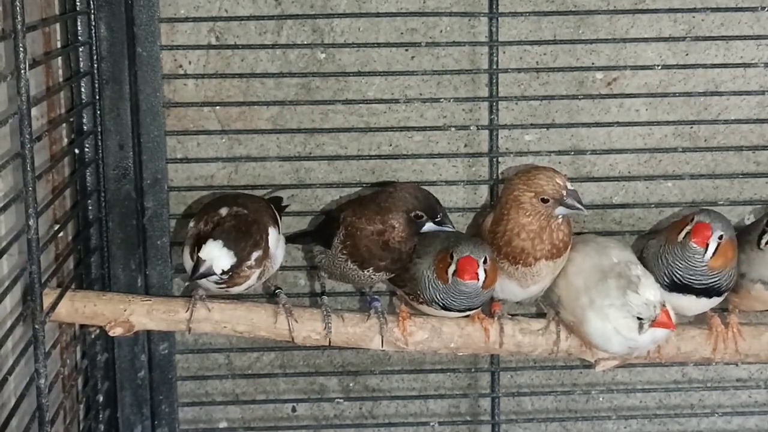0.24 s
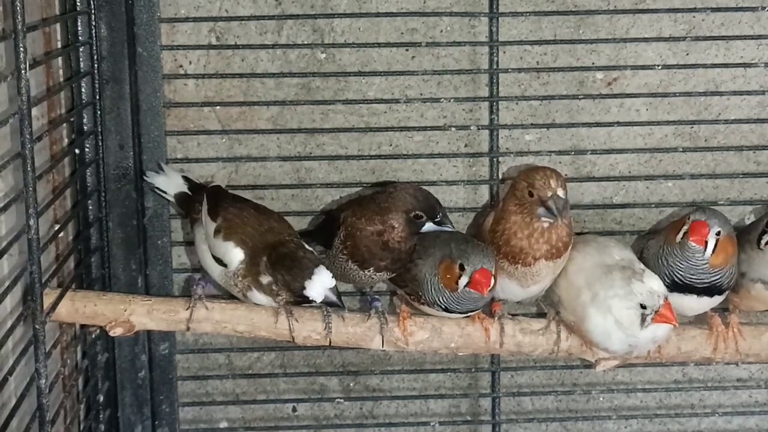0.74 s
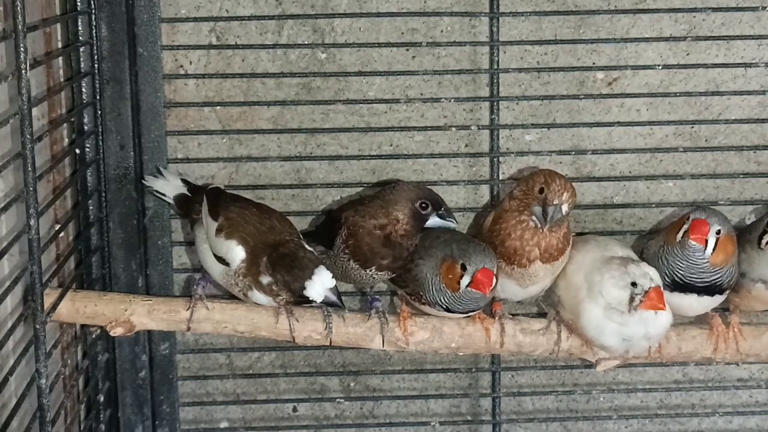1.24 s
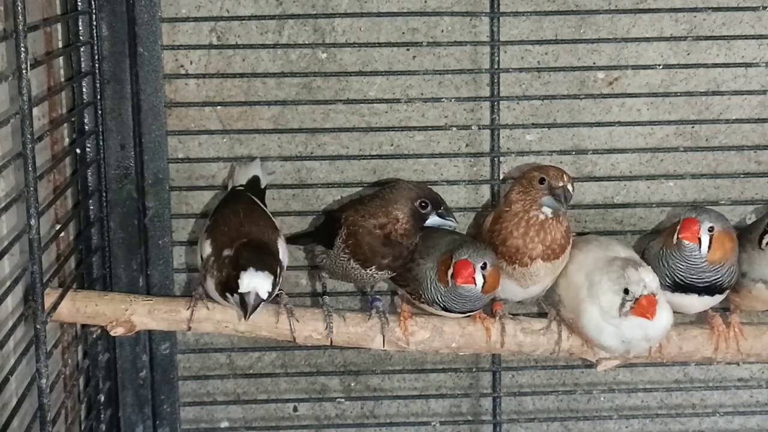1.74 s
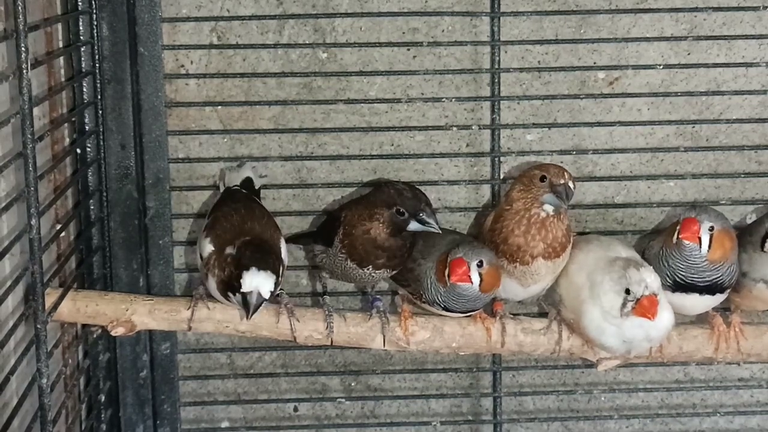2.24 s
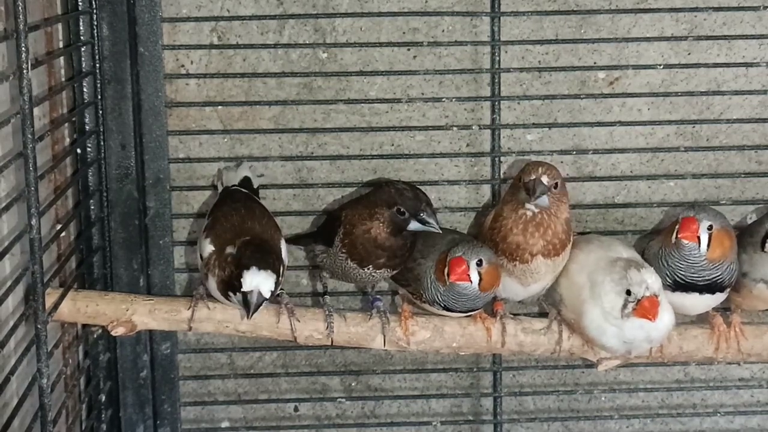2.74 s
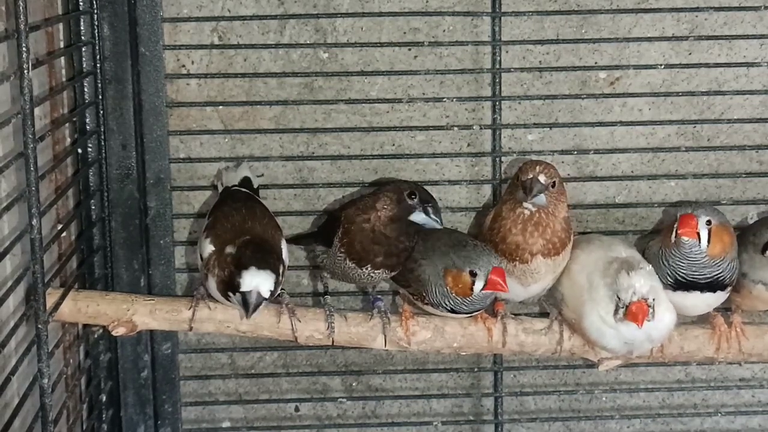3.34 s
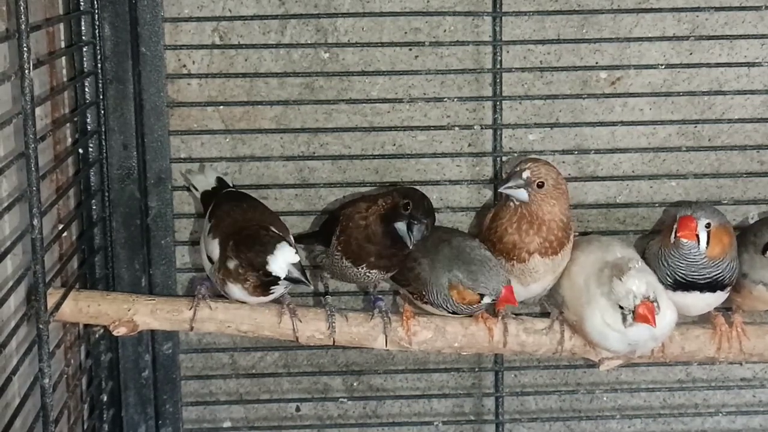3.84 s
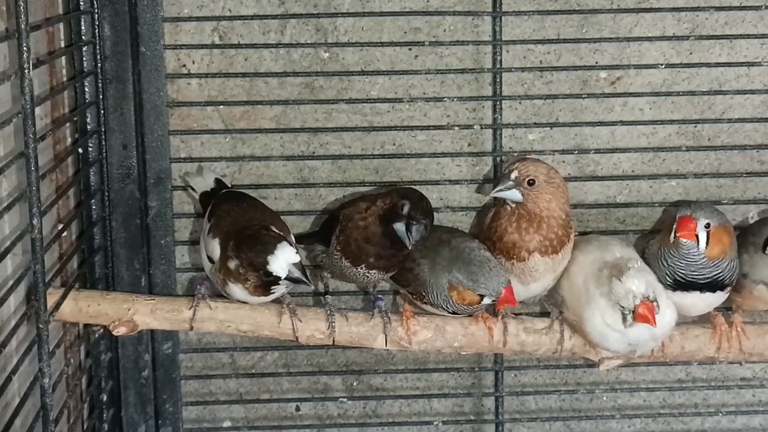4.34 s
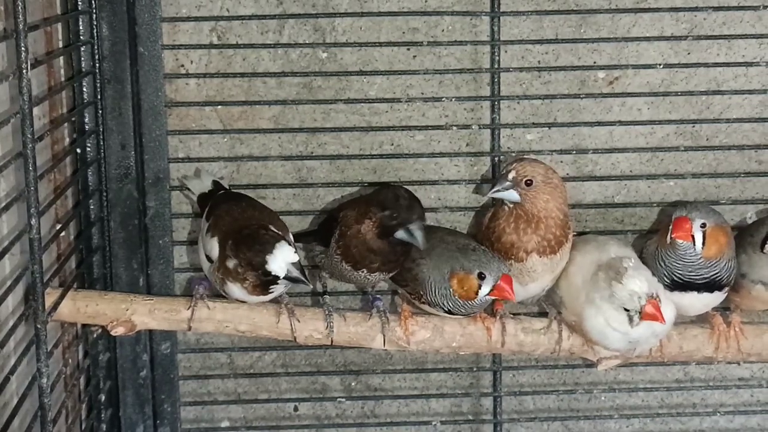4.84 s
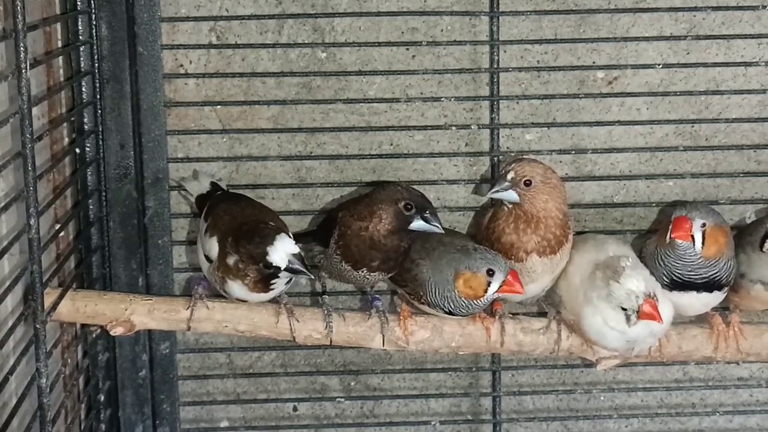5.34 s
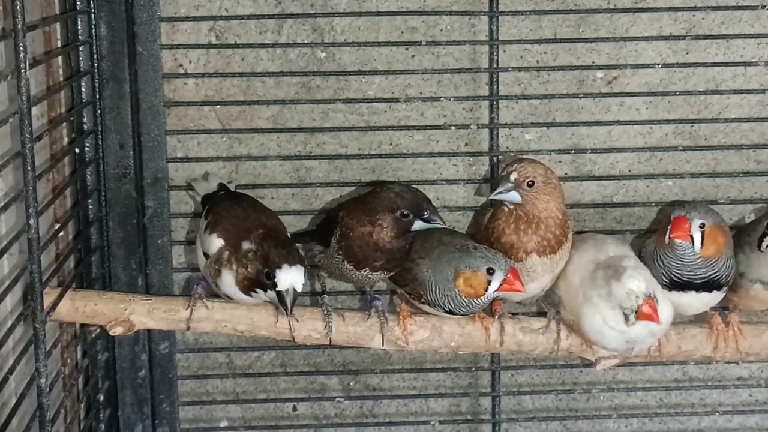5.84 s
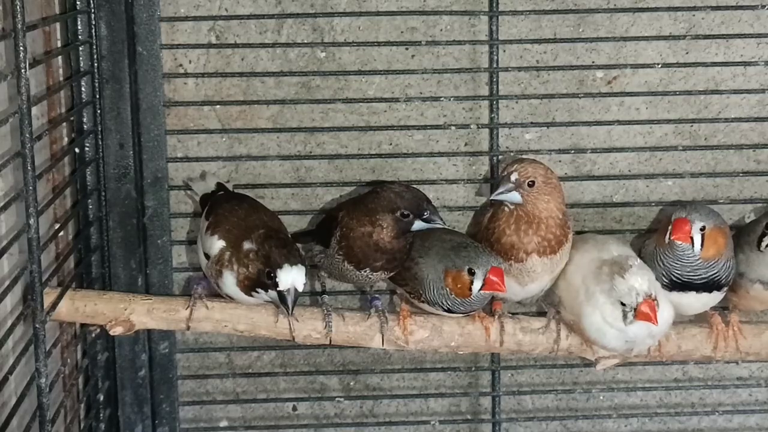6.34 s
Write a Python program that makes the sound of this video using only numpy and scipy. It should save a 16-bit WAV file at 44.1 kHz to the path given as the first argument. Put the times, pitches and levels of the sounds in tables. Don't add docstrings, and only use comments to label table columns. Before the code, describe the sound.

Small caged finches give short, bright, nasal chirps one at a time in a hard-walled room, with faint peeps, rustles and low hum.

```python
import sys
import numpy as np
from scipy import signal
from scipy.fft import rfft, irfft, next_fast_len
from scipy.io import wavfile
from scipy.ndimage import uniform_filter1d, minimum_filter1d

SR = 44100
rng = np.random.default_rng(int(sys.argv[2]) if len(sys.argv) > 2 else 0)


def gain_from_db(level_db):
    decades = np.asarray(level_db, float) / 20
    return 10 ** decades


def wav_record(signal):
    frames = np.transpose(np.atleast_2d(signal))
    bounded = np.clip(frames, -1, 1)
    quanta = np.round(bounded * 32767).astype(np.int16)
    wavfile.write(sys.argv[1], SR, quanta)


N = 290619


def rms_one(x):
    return x / np.sqrt(np.mean(x ** 2) + 1e-20)


def at_hz(points, hz):
    table = np.array(points)
    return np.interp(np.log(hz), np.log(table[:, 0]), table[:, 1])


def filtered(x, order, edges_hz, kind):
    return signal.sosfilt(signal.butter(order, edges_hz, kind, fs=SR, output="sos"), x)


def white(size):
    return rng.standard_normal(max(size, SR // 3))[:size]


def drift(rate_hz, size):
    r = np.exp(-2 * np.pi * rate_hz / SR)
    settle = 4000
    return rms_one(signal.lfilter([1], [1, -2 * r, r * r], white(size + settle))[settle:])


def sampled(rows):
    time_s, *columns = np.transpose(rows)
    start = int(time_s[0] * SR)
    t = np.arange(start, int(time_s[-1] * SR)) / SR
    return start, [np.interp(t, time_s, column) for column in columns]


def add(out, start, x, pan_db):
    x = x * signal.windows.tukey(len(x), min(1, 260 / len(x)))
    x = x[:N - start]
    out[:, start:start + len(x)] += x * gain_from_db(np.array([[pan_db / 2], [-pan_db / 2]]))


def stack(pitch_hz, partial_db, rough, count):
    size = len(pitch_hz)
    phase = 2 * np.pi * np.cumsum(pitch_hz * (1 + 0.13 * rough * drift(280, size))) / SR
    wave, power = 0, 1e-20
    for k in range(1, count + 1):
        gain = gain_from_db(partial_db(k, k * pitch_hz)) * (k * pitch_hz < .4 * SR)
        flutter = 1 + rough * drift(300, size)
        wave = wave + gain * flutter * np.sin(k * phase + k * k)
        power = power + gain ** 2 / 2
    return wave / np.sqrt(power)


REST_HZ, LEAP_CURVE, TAIL_SAG_HZ_PER_S = 1560, 1.45, 1800
TENSE_HZ, TENSE_ONSET_S = 2002, 0.006
ONSET_DB, ONSET_S, ONSET_MUTE_DB = 23, 0.0073, -1.5
DROP_LOSS_DB_PER_OCTAVE, DROP_HOARSE, STEADY_MUTE_DB = 25, 0.14, 8.5


def gesture(tense, climb_hz_per_s, length_s, top_hz, end_hz, level_db,
            leap_s, turn_s, fall_s, fade_db, mute_db):
    t = np.arange(int(length_s * SR)) / SR
    dropped = np.clip((t - turn_s) / fall_s, 0, 1)
    slack = np.exp(-max(mute_db, 0) / STEADY_MUTE_DB)
    rest_hz, onset_s = (TENSE_HZ, TENSE_ONSET_S) if tense else (REST_HZ, ONSET_S)
    onset = np.exp(-t / onset_s)

    sag_hz = TAIL_SAG_HZ_PER_S * np.maximum(t - turn_s - fall_s, 0)
    drop_hz = (top_hz - end_hz) * dropped ** 1.1 + sag_hz
    leap_hz = (top_hz - rest_hz) * np.exp(-(t / leap_s) ** LEAP_CURVE)
    below_hz = climb_hz_per_s * np.maximum(turn_s - t, 0) * (1 - np.exp(-t / leap_s))
    pitch_hz = top_hz - leap_hz - below_hz - drop_hz

    drop_db = slack * DROP_LOSS_DB_PER_OCTAVE * np.log2(1 - drop_hz / top_hz)
    level_db = level_db - ONSET_DB * onset - fade_db * (t / length_s) ** 1.32 + drop_db
    low_db = -ONSET_MUTE_DB * onset - mute_db * dropped
    return pitch_hz, level_db, low_db, slack * DROP_HOARSE * dropped


# start_s, length_s, top_hz, end_hz, level_db
CHIRPS = [(0.141, 0.081, 2276, 1737, -16), (0.278, 0.064, 1950, 1540, -12.5),
          (0.674, 0.068, 2185, 1757, -16.5), (0.703, 0.06, 1854, 1560, -20), (1.637, 0.14, 2377, 2136, -16),
          (2.225, 0.099, 2479, 2179, -15), (2.646, 0.073, 2279, 2193, -14), (3.29, 0.1, 2503, 2200, -15.5),
          (4.166, 0.076, 2274, 1662, -17.5), (4.331, 0.066, 2415, 1967, -12.5),
          (5.444, 0.068, 1847, 1505, -18), (5.472, 0.029, 2390, 1843, -22),
          (2.683, 0.038, 2165, 2153, -14.5), (3.386, 0.045, 2540, 2239, -19.5)]
# leap_s, turn_s, fall_s, fade_db, mute_db (low partials, after the drop)
BENDS = [(0.011, .056, 0.013, 4, -1.5), (0.01, .035, .028, 13.5, 4), (0.0096, .042, 0.022, 4.5, 5.5),
         (0.0099, .04, 0.0092, 5.5, 0.5), (0.008, .032, 0.017, 26.5, 30),
         (0.0099, 0.043, 0.0051, 12.5, 26.5), (0.0078, 0.047, 0.024, 18.5, 15.5),
         (.011, .032, .056, 0.5, 5), (.012, 0.054, 0.018, 3, 3.5), (0.009, .04, 0.004, 11.5, 25.5),
         (0.007, .041, 0.02, 8.5, 2.5), (0.008, 0.013, 0.014, 8.5, 4.5), (0.0056, 0.016, 0.012, 12.5, 4.5),
         (0.0019, .006, 0.02, 15, 2)]
# pan_db (left-right), beak_hz, lift_db, rough (0-1), second_db
PERCH = [(-3, 19000, -3, 0.05, 0), (-2.5, 1300, 4.5, 0.05, 0.5), (-2.5, 6500, 4, 0.01, -0.5),
         (-0.5, 2500, -0.5, 0.2, -2), (-3, 6230, 12.5, 0.13, 3), (1, 6500, 11, 0.07, 7),
         (-5.5, 15750, 16.5, .05, -1), (0, 5480, 7.5, 0.03, 2.5), (-0.5, 6900, 3.5, 0.05, -1),
         (4.5, 4750, 6, 0.16, 5.5), (-0.5, 7930, 11.5, 0.1, -4.5), (9, 4030, -2.4, 0.4, 10),
         (-6.5, 6550, 23, 0.3, -8.5), (2.3, 5800, 7, 0.2, 9)]
# first_db, treble_db (per octave above partial 3), fourth_db, fifth_db, climb_hz_per_s
VOICES = [(1.5, -1.5, -2.9, 2, 2500), (2, 2.5, 3.5, -3.5, 1300), (6, -1.5, 1, 3.5, 810),
          (0, 0, 2.5, -3.3, 2600), (2.5, -2.5, 0.1, -0.2, 350), (3, -2.5, 0.5, -2, 670),
          (0, -0.5, 0.5, 2.5, 230), (1.5, -8.5, -5, 3, 250), (3, -2.5, -2.5, 2.5, 1600),
          (6, -3.5, -2.5, 1, 4400), (4.5, 0, 2.5, -0.5, 3500), (13.5, -5.5, -4.2, 11.8, 300),
          (-17, -1, 6, -1.8, 300), (-2.5, -2.5, 2.8, 4, 280)]
TENSE = (9, 11, 13)
# multiple, level_db
SYRINX = [(1, -3), (2, -3.5), (3, -2), (4, -9), (5, -17), (6, -21), (7, -24.5), (8, -19), (9, -24.5)]
# freq_hz, gain_db
TRACT = [(1350, -19.5), (1560, -1.5), (2300, -0.5), (3000, 9.5), (4000, -1), (8200, 1), (12700, 9.5),
         (15800, -8)]
FOURTH_PER_MUTE, SIXTH_PER_MUTE = 0.45, 0.27


def chirps():
    out = np.zeros((2, N))
    for i, ((start_s, *call), bend, perch, voice) in enumerate(zip(CHIRPS, BENDS, PERCH, VOICES)):
        pan_db, beak_hz, lift_db, rough, second_db = perch
        first_db, treble_db, fourth_db, fifth_db, climb_hz_per_s = voice
        pitch_hz, level_db, low_db, cracked = gesture(i in TENSE, climb_hz_per_s, *call, *bend)
        own_db = {1: first_db, 2: second_db, 4: fourth_db - FOURTH_PER_MUTE * bend[-1], 5: fifth_db,
                  6: -SIXTH_PER_MUTE * np.minimum(low_db, 0)}

        def partial_db(k, hz):
            source_db = SYRINX[k - 1][1] + low_db * (k <= 2) + own_db.get(k, 0)
            tilt_db = treble_db * np.log2(max(k / 3, 1))
            beak_db = lift_db * np.exp(-(np.log2(hz / beak_hz) / 0.12) ** 2)
            return source_db + tilt_db + at_hz(TRACT, hz) + beak_db

        size = len(pitch_hz)
        high_noise = filtered(white(size), 3, [7500, 14500], "band")
        hoarse = rough + cracked + .55 * np.exp(-np.arange(size) / (.008 * SR))
        call_wave = stack(pitch_hz, partial_db, hoarse, count=9) + gain_from_db(-20) * high_noise
        add(out, int(start_s * SR), gain_from_db(level_db) * call_wave, pan_db)
    return filtered(out + 1e-18, 6, 1450, "high")


# time_s, pitch_hz, level_db
NASAL = [
    [(2.082, 625, -52), (2.09, 619, -37.5), (2.102, 619.3, -43.5), (2.17, 600, -44.5)],
    [(4.425, 685, -51), (4.439, 640, -36.5), (4.461, 619, -45.5), (4.47, 547, -29.5)],
    [(5.175, 506, -52), (5.183, 545, -47.5), (5.233, 598.4, -44.5), (5.259, 551, -47.5), (5.275, 540, -73)],
    [(5.965, 485, -50.5), (5.99, 562, -33)],
]
# pan_db (left-right), first_db, treble_db (per octave), rough (0-1)
NASAL_VOICE = [(5, -2.5, -19, 0.049), (-6.5, -8, 21, 0.19), (-1.5, -13.5, -11.5, 0.043),
               (7.5, -3.5, -39, 0.051)]
# freq_hz, gain_db
NASAL_THROAT = [(290, -30), (520, -8.5), (850, -23.5), (1200, -17), (1800, -11.5), (2900, -11),
                (5600, -16.5), (9000, -61.5)]


def nasal_notes():
    out = np.zeros((2, N))
    for rows, (pan_db, first_db, treble_db, rough) in zip(NASAL, NASAL_VOICE):
        start, (pitch_hz, level_db) = sampled(rows)

        def partial_db(k, hz):
            return at_hz(NASAL_THROAT, hz) + first_db * (k == 1) + treble_db * np.log2(max(k / 6, 1))

        add(out, start, gain_from_db(level_db - 4.5) * stack(pitch_hz, partial_db, rough, count=14), pan_db)
    return out


# time_s, pitch_hz, level_db
SQUAWK = [
    (5.991, 1024, -29.5),
    (5.997, 1030, -29),
    (6.003, 1234, -41),
    (6.015, 1302, -32.5),
    (6.022, 1140, -74),
    (6.035, 1074, -67.5),
]
# freq_hz, gain_db
SQUAWK_THROAT = [(350, -59), (600, -8), (1210, -14.5), (1400, -14), (2190, -4), (2790, -11.5), (3700, 0.5),
                 (5840, -16.5), (15000, -31.5)]


def squawk():
    out = np.zeros((2, N))
    start, (pitch_hz, level_db) = sampled(SQUAWK)
    voice = stack(pitch_hz, lambda k, hz: at_hz(SQUAWK_THROAT, hz), 0.48, count=14)
    add(out, start, gain_from_db(level_db) * voice, -1.5)
    return out


# start_s, level_db, decay_s,
# centre_hz, width_octaves
RUSTLES = [(1.023, -53, 0.0084, 2290, 0.88), (1.063, -46.5, 0.0049, 1970, 1.03),
           (1.679, -45, 0.0053, 190, 2.4), (2.271, -51, 0.0056, 260, 1.6),
           (2.174, -56.5, 0.025, 3100, 0.65), (3.698, -67.5, 0.043, 5300, 0.48),
           (0.74, -50.5, 0.009, 920, 0.38), (5.457, -54.5, 0.043, 860, 0.66),
           (1.357, -60.5, 0.011, 3000, 2.5), (3.193, -64, 0.01, 7920, 2.9), (3.608, -56.5, 0.01, 4500, 1.1),
           (3.97, -63, 0.014, 3040, 1.3), (4.713, -64, 0.034, 3900, 3), (5.005, -53.5, 0.025, 14800, 0.48),
           (2.94, -55, .006, 1260, 2.6), (2.686, -27, .004, 2000, 2.4), (5.484, -28.5, .003, 4700, 1.9),
           (4.333, -25.5, 0.0088, 5000, 2.3), (5.011, -58.5, 0.011, 3800, 2.4),
           (5.079, -63.5, 0.053, 9000, 1.1), (5.291, -63, 0.013, 11200, 0.79),
           (5.417, -61, 0.033, 3100, 1.8), (5.666, -56.5, 0.013, 8600, 3.1),
           (5.833, -61, 0.026, 2750, 0.93), (6.088, -62.5, 0.013, 7900, 2.3),
           (6.351, -64.5, 0.027, 3300, 1.4)]


def rustles():
    out = np.zeros((2, N))
    for start_s, level_db, decay_s, centre_hz, width_octaves in RUSTLES:
        t = np.arange(int(4 * decay_s * SR)) / SR
        edges_hz = np.clip(centre_hz * 2 ** (np.array([-.5, .5]) * width_octaves), 100, .45 * SR)
        grains = white(len(t)) * gain_from_db(3 * drift(400, len(t)))
        puff = rms_one(filtered(grains, 2, edges_hz, "band"))
        add(out, int(start_s * SR), gain_from_db(level_db) * puff * np.exp(-t / decay_s), 0)
    return out


# start_s, first_hz, level_db
PEEPS = [(0.625, 3550, -83), (0.91, 3640, -70), (.95, 4020, -71), (1.41, 3580, -70.5), (1.514, 3730, -70),
         (1.937, 3770, -73), (2.516, 3717, -68.5), (2.574, 3340, -67.5), (2.94, 3560, -66.5),
         (3.1, 3750, -72), (3.15, 2940, -72.5), (3.2, 2660, -74), (3.72, 3350, -72.5), (3.95, 3700, -75),
         (4.02, 3130, -71), (4.58, 3820, -70), (4.696, 3760, -64), (5.017, 3360, -68.5), (5.06, 3990, -72),
         (5.08, 2350, -71), (5.7, 3530, -70), (5.79, 3500, -68), (6.365, 3580, -66)]
PEEP_S, PEEP_SLIDE = .045, .11
# start_s, first_hz, level_db
TICKS = [
    (4.995, 5230, -75),
    (5.171, 5320, -70),
    (5.419, 5520, -71),
    (5.832, 5550, -66),
    (6.338, 5420, -72),
]
TICK_S, TICK_SLIDE = 0.018, 0.112
# start_s, length_s, first_hz, last_hz, level_db
COOS = [(0.06, 0.018, 2340, 2250, -77), (0.567, 0.046, 2300, 2390, -67.5), (1.219, 0.065, 681, 600, -68),
        (1.772, 0.22, 778, 710, -71.5), (2.56, 0.03, 690, 605, -61.5), (2.88, 0.032, 212, 197.6, -53.5),
        (2.94, 0.019, 208.5, 200, -50), (3.951, 0.046, 5160, 2205, -75), (5.85, 0.02, 1210, 1090, -70),
        (5.888, .06, 2600, 3640, -75), (5.921, 0.053, 3590, 3920, -72), (6.377, 0.044, 1100, 985, -79)]


def far_notes():
    out = np.zeros((2, N))
    slides = [(s, PEEP_S, hz, hz * (1 - PEEP_SLIDE), db) for s, hz, db in PEEPS]
    slides += [(s, TICK_S, hz, hz * (1 - TICK_SLIDE), db) for s, hz, db in TICKS]
    for start_s, length_s, first_hz, last_hz, level_db in slides + list(COOS):
        size = int(length_s * SR)
        pitch_hz = np.linspace(first_hz, last_hz, size) * (1 + 0.02 * drift(250, size))
        whistle = np.hanning(size) ** .5 * np.sin(2 * np.pi * np.cumsum(pitch_hz) / SR)
        add(out, int((start_s - .006) * SR), gain_from_db(level_db + 7) * whistle, 0)
    return out


# freq_hz, left_minus_right_db
PORTS = [(500, -3), (2000, -2.5), (5500, -11), (9000, -4.5), (13000, 12.5)]
# freq_hz, t60_s
ROOM_T60 = [(500, 0.2), (1500, 0.22), (4000, 0.25), (8000, 0.21), (13000, 0.17)]
ROOM_DB, EARLY_DB, PORT_LAG_S = -3, -5, .0001


def room(x):
    t = np.arange(int(.6 * SR)) / SR
    tail = 0
    edges_hz = 125 * 2. ** np.arange(8)
    for low_hz, high_hz in zip(edges_hz, np.append(edges_hz[1:], 19000)):
        band = filtered(rng.standard_normal((2, len(t))), 2, [low_hz, high_hz], "band")
        tail = tail + band * gain_from_db(-60 * t / at_hz(ROOM_T60, np.sqrt(low_hz * high_hz)))
    tail = tail * (1 - np.exp(-(t / 0.006) ** 2))
    tail = tail / np.sqrt(np.sum(tail ** 2, axis=1, keepdims=True)) * gain_from_db(ROOM_DB)

    early = np.zeros((2, len(t)))
    for side in early:
        delays = (rng.uniform(.0008, .007, 10) * SR).astype(int)
        side[delays] = gain_from_db(EARLY_DB) * rng.uniform(-1, 1, 10)

    size = next_fast_len(N + len(t))
    bins = np.arange(size // 2 + 1)
    colour_db = at_hz(PORTS, bins * SR / size + 1) * [[.5], [-.5]]
    left_only = np.array([[1], [0]])
    lag = np.exp(-2j * np.pi * bins / size * PORT_LAG_S * SR * left_only)
    near = rfft(x, size) * gain_from_db(colour_db) * (1 + rfft(early, size)) * lag
    far = rfft(x.mean(axis=0), size) * rfft(tail, size)
    return irfft(near + far, size)[:, :N]


# freq_hz, likeness (0-1)
LIKENESS = [(30, 0.92), (90, 0.65), (200, 0.84), (400, 0.082), (1000, 0.21), (4000, 0.055)]


def banded_noise(spectrum):
    out = 0
    edges_hz = 20 * 2 ** np.arange(0, 10, .5)
    gusts_db = 0.95 * drift(27, N)
    sources = rng.standard_normal((2, 2, N))
    for k, (low_hz, high_hz) in enumerate(zip(edges_hz, edges_hz[1:])):
        hz = np.sqrt(low_hz * high_hz)
        if spectrum[0][0] / 1.2 < hz < spectrum[-1][0] * 1.2:
            mid, side = filtered(sources[k % 2], 2, [low_hz, high_hz], "band")
            alike = np.clip(at_hz(LIKENESS, hz), 0, 1)
            gain = gain_from_db(at_hz(spectrum, hz) + 0.76 * drift(5.5, N) + gusts_db)
            out = out + gain * (np.sqrt(1 + alike) * mid + np.sqrt(1 - alike) * side * [[1], [-1]])
    return rms_one(out)


# freq_hz, density_db (per Hz)
HUM = [(13, -45), (22, -32), (69, 2), (93, 3.5), (500, -17.5), (650, -43.5), (1100, -120)]
HUM_DB, HUM_WANDER_DB, HUM_SWELL_S, HUM_SWELL_DB = -56.5, .8, 4.95, 2


def hum(duck_db):
    t = np.arange(N) / SR
    swell_db = HUM_SWELL_DB * np.clip((t - HUM_SWELL_S) / .5, 0, 1)
    level_db = HUM_DB + HUM_WANDER_DB * drift(1.6, N) + swell_db
    return gain_from_db(level_db + 0.34 * duck_db) * banded_noise(HUM)


# freq_hz, density_db (per Hz)
AIR = [(180, -30.5), (300, -5.5), (883, -12.5), (1400, -14.5), (2100, -12), (3000, -14), (3900, -53.5),
       (6600, -120)]
# freq_hz, density_db (per Hz)
HISS = [(1760, -33.5), (3000, -2), (3610, -1.5), (8930, -10.5), (15000, -13.5), (16200, -21), (16500, -46)]
# time_s, level_db
SWAY = [(0, -11), (.68, 4), (1.49, -3), (1.67, 6), (2.07, -1), (2.92, -2), (3.34, 10), (3.82, -14.5),
        (4.24, -13.5), (4.62, 5), (5.3, -14.5), (5.91, -4), (6.28, -20), (6.59, -9)]
AIR_DB, AIR_FOLLOWS, HISS_DB = -59, 0.31, -64


def air_and_hiss(duck_db):
    sway_db = np.interp(np.arange(N) / SR, *np.transpose(SWAY))
    air = gain_from_db(AIR_DB + AIR_FOLLOWS * sway_db) * banded_noise(AIR)
    hiss = gain_from_db(HISS_DB + sway_db) * banded_noise(HISS)
    return (air + hiss) * gain_from_db(duck_db)


def ducking(loud):
    level_db = 10 * np.log10(uniform_filter1d(np.mean(loud ** 2, axis=0), 441) + 1e-9)
    ramp_db = 45 * np.arange(N) / SR
    held_db = np.maximum.accumulate(level_db + ramp_db) - ramp_db
    return -.22 * np.maximum(held_db + 40, 0)


def scene():
    birds = room(chirps() + nasal_notes() + squawk() + far_notes() + rustles()) * gain_from_db(0.6)
    duck_db = ducking(birds)
    return birds + hum(duck_db) + air_and_hiss(duck_db)


CEILING = .84


def limiter(x):
    gain = np.minimum(1, CEILING / (np.abs(x).max(axis=0) + 1e-9))
    return x * uniform_filter1d(minimum_filter1d(gain, size=441), size=220)


def top_cut(x):
    return signal.sosfilt(signal.butter(12, 16990, fs=SR, output="sos"), x)


SELF_NOISE_DB, SELF_NOISE_HZ, TOP_HZ = -77, 10000, 16050


def record(dry):
    x = filtered(limiter(dry), 2, 42, "high")
    x = x + gain_from_db(SELF_NOISE_DB) * filtered(rng.standard_normal((2, N)), 2, SELF_NOISE_HZ, "high")
    x = signal.sosfilt(signal.cheby2(12, 50, TOP_HZ + 560, fs=SR, output="sos"), x)
    return top_cut(x)


dry = scene()
out = record(dry)
wav_record(out)
```